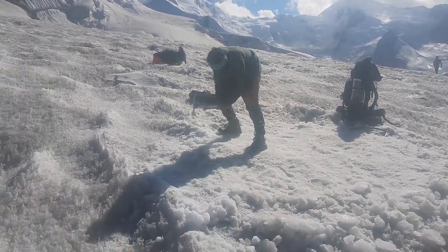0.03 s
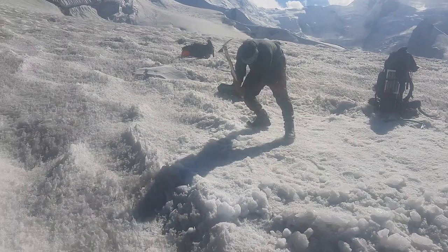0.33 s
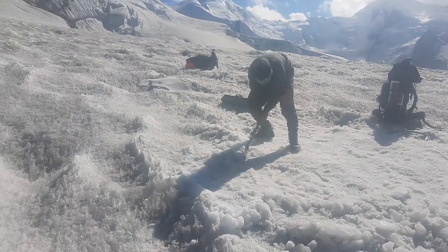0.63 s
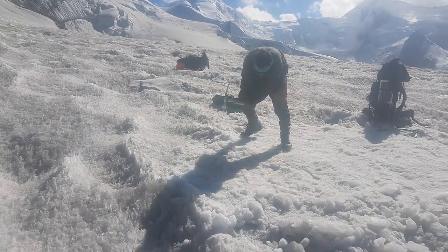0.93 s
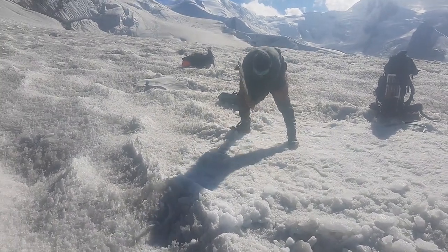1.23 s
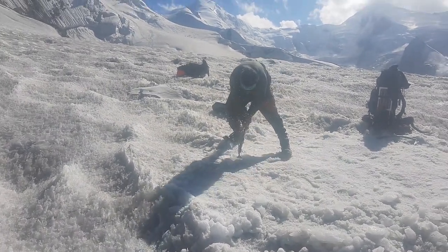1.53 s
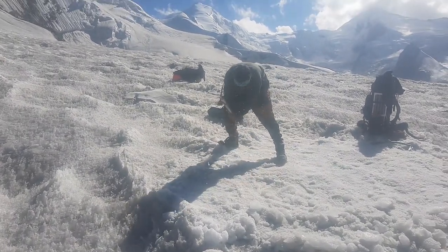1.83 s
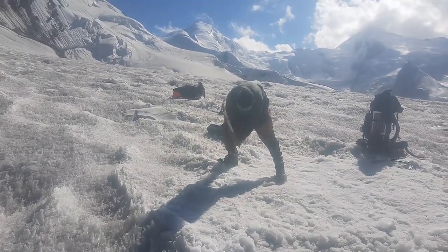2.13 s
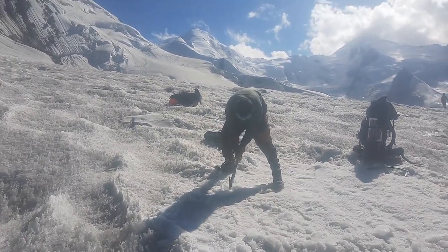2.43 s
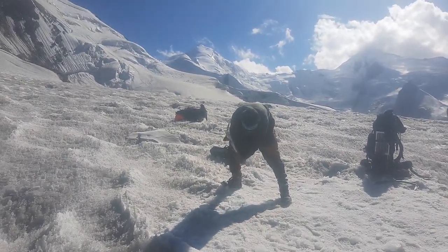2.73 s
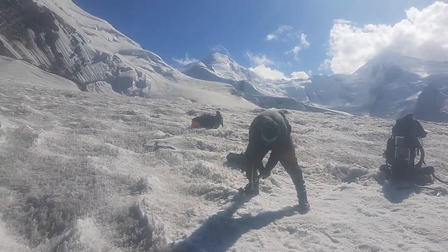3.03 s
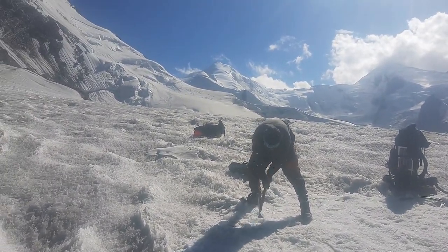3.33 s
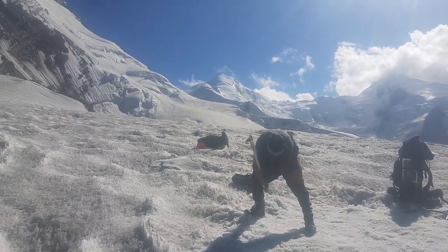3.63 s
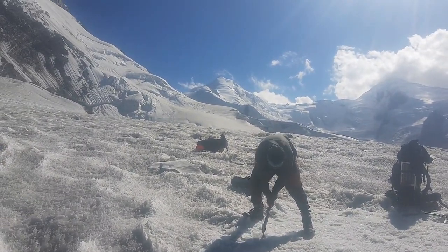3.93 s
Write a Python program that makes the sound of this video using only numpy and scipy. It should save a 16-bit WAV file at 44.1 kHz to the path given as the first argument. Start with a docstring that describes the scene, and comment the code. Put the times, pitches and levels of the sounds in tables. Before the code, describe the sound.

An ice axe chops hard snow four times at an even pace, each blow a crunch and a knock. Ice chips tick and clothing swishes faintly, while wind buffets a stereo microphone a few metres away on a glacier.

```python
"""On a glacier, a stereo microphone a few metres from a climber with an ice axe.
From the start, gusts buffet the two ports separately, the right one hardest, and clothing swishes
and squeaks. From 0.7 s to 3.2 s the axe chops the hard snow four times: each blow crunches, knocks
and throws up powder, and loose chips of ice tick around the swings. Just before the last blow comes a
sharp click, as of a wind pop overloading the microphone. Wind and a faint hiss carry on to the end."""
import sys
import numpy as np
from scipy.fft import rfft, irfft, next_fast_len
from scipy.io import wavfile
from scipy.ndimage import map_coordinates

SR = 44100
rng = np.random.default_rng(int(sys.argv[2]) if len(sys.argv) > 2 else 0)


def generate_wav(signal):
    """Clip the signal to [-1, 1] and save it as 16-bit WAV at the path in sys.argv[1]."""
    frames = np.transpose(np.atleast_2d(signal))
    scaled = np.clip(frames, -1, 1) * 32767
    pcm = np.round(scaled).astype(np.int16)
    wavfile.write(sys.argv[1], SR, pcm)


N = 176400

# axe blows (time [s], crunch [dB], knock [dB], thud [dB], thud pitch [Hz], delay of second break [s],
# second break [dB], spray [dB], treble tilt [dB/octave])
BLOWS = [(0.6642, -26, -42, -23.5, 980, 0.0068, -50, -57, 2.5),
         (1.5181, -21, -19, -15.5, 965, .013, -41, -49.5, 1.5),
         (2.3799, -22.5, -21, -13, 1230, 0.0099, -35, -57.5, -2.2),
         (3.2227, -26.5, -27, -25, 1310, .012, -49.5, -63, 0.6)]
# spectrum of breaking snow (frequency [Hz], relative density [dB])
SNOW_SPECTRUM = [(300, -17), (700, 7), (1500, 0), (2400, -3), (3200, 4.5), (5000, -3), (6000, 3), (7600, 2),
                 (10000, -4), (13000, -13), (15500, -24)]
SNOW_PAN_DB, CLOTH_PAN_DB = -8.5, -5  # left minus right


def amp(db):
    """Decibels as a gain."""
    return 10 ** (np.asarray(db) / 20)


def unit(x):
    """x scaled to rms 1."""
    return x / np.sqrt(np.mean(x ** 2) + 1e-20)


def along(points, hz):
    """(frequency [Hz], value) points, interpolated on a log axis."""
    freqs, values = np.transpose(points)
    return np.interp(np.log(hz + 1), np.log(freqs + 1), values)


def curve(points):
    """(time [s], value) points, interpolated to one value a sample."""
    return np.interp(np.arange(N) / SR, *np.transpose(points))


def wobble(rate):
    """A smooth random curve, rate knots a second."""
    return map_coordinates(rng.standard_normal(N // 4), [np.arange(N) * rate / SR], mode="wrap")


def filtered(x, response):
    """x through a filter given as a function of frequency."""
    size = next_fast_len(N + SR // 4)
    return irfft(rfft(x, size) * response(np.fft.rfftfreq(size, 1 / SR)), size)[..., :N]


def pan(db):
    """Left and right gains, the left louder by db."""
    return amp(np.array([[db], [-db]]) / 2)


def noise(spectrum, apart, tilt_db=0):
    """Stereo noise of rms 1, tilted above 1 kHz; apart is the size of what the ports do not share."""
    def colour(hz):
        return amp(along(spectrum, hz) + tilt_db * np.log2(np.maximum(hz / 1000, 1)))
    white = rng.standard_normal(N) + apart * rng.standard_normal((2, N))
    return unit(filtered(white, colour))


def burst(start, attack, hold, t60):
    """Envelope of attack, hold and exponential release, all in seconds."""
    t = np.arange(N) / SR - start
    return np.clip(t / attack, 0, 1) * np.exp(-np.log(1000) * np.clip((t - attack - hold) / t60, 0, 5))


def crunch(lump_db=6.5):
    """The pick breaks the crust, breaks it again as it sinks in, and throws up a gritty spray."""
    out = np.zeros((2, N))
    lumps = unit(amp(lump_db * wobble(rate=680)))
    for start, db, _, _, _, delay, second_db, spray_db, tilt_db in BLOWS:
        first_break = amp(db) * burst(start, attack=0.00049, hold=0.0025, t60=0.02)
        second_break = amp(second_db) * burst(start + delay, attack=0.0013, hold=0.0025, t60=0.028)
        spray = amp(spray_db) * lumps * burst(start, attack=0.011, hold=0.005, t60=0.18)
        out += (first_break + second_break + spray) * grit(tilt_db)
    return out * pan(SNOW_PAN_DB)


def grit(tilt_db, rough_db=3, left_lag_s=0.000021):
    """Dense breaking of snow crystals, heard first at the right port."""
    crystals = noise(SNOW_SPECTRUM, apart=0.5, tilt_db=tilt_db) * amp(rough_db * wobble(rate=2500))
    delays = np.array([[left_lag_s], [-left_lag_s]]) / 2
    return unit(filtered(crystals, lambda hz: np.exp(-2j * np.pi * hz * delays)))


def knock(delay_s=0.00098, attack_s=0.00043, thud_t60=0.017):
    """The axe rings briefly, damped by the snow, over the dead thud of the crust."""
    # modes of pick and shaft (frequency [Hz], level relative to the knock [dB], t60 [s])
    axe_modes = [(646, -11.5, 0.027), (810, -10, 0.028), (1746, -2.5, 0.037), (1844, -4, .035),
                 (2244, -15, .025), (3066, -4, 0.026), (4140, -14, .03), (5965, -25, .05),
                 (7180, -9, 0.035)]
    out, t = np.zeros(N), np.arange(SR // 8) / SR
    for start, _, knock_db, thud_db, thud_hz, *_ in BLOWS:
        modes = [(hz, db + knock_db, t60) for hz, db, t60 in axe_modes]
        ring = np.zeros(len(t))
        for hz, db, t60 in modes + [(thud_hz, thud_db, thud_t60)]:
            decay = amp(db + rng.normal(0, 0.6)) * np.exp(-np.log(1000) * t / t60)
            ring += decay * np.sin(2 * np.pi * (hz * rng.normal(1, 0.0036) * t + rng.random()))
        out[round((start + delay_s) * SR):][:len(t)] += ring * (1 - np.exp(-t / attack_s))
    return out * pan(db=4)


def ticks(gain_db=-9.5, width_octaves=1.2, crumbs_per_s=8.2, crumb_db=-52, crumb_t60=0.026):
    """Short noise bursts: ice chips and crumbs on the crust, and one sharp click on a wind pop."""
    # ticks (time [s], relative level [dB], band centre [Hz], t60 [s]); the one at 3.07 s is the
    # click of a wind pop overloading the microphone, the others are ice chips
    timed_ticks = [(0.127, -48, 7500, 0.022), (.1425, -32.5, 5000, 0.0054), (0.553, -39, 7000, 0.043),
                   (0.8947, -30, 3480, 0.0092), (1.155, -37, 1900, .035), (1.32, -30, 7000, .04),
                   (1.336, -32, 3500, .035), (1.4583, -35, 6000, .025), (1.574, -37, 7500, .04),
                   (1.6426, -38, 9000, 0.015), (1.652, -40, 9000, .015), (1.7752, -39, 7000, 0.054),
                   (2.3212, -47.5, 7500, .03), (2.572, -34, 2200, 0.013), (2.6557, -48, 4000, 0.036),
                   (2.6765, -46, 5000, 0.035), (2.903, -42.5, 4200, 0.02), (3.0698, -37, 3910, 0.0042),
                   (3.391, -49.5, 7000, .04), (3.4953, -37, 5850, .04), (3.9848, -45.5, 6900, 0.043)]
    crumbs = [(when * N / SR, crumb_db + 4.5 * (2 * size - 1), 4000 + 5000 * brightness, crumb_t60)
              for when, size, brightness in rng.random((int(crumbs_per_s * N / SR), 3))]
    out, t = np.zeros((2, N + SR)), np.arange(SR // 10) / SR
    octave = np.log2(np.fft.rfftfreq(len(t), 1 / SR) + 1)
    colour = amp(along(SNOW_SPECTRUM, 2 ** octave))
    for start, db, hz, t60 in timed_ticks + crumbs:
        white = rng.standard_normal(len(t)) + 0.5 * rng.standard_normal((2, len(t)))
        band = np.exp(-((octave - np.log2(hz)) / width_octaves) ** 2)
        tick = unit(irfft(rfft(white) * band * colour, len(t))) * np.exp(-np.log(1000) * t / t60)
        out[:, round(start * SR):][:, :len(t)] += amp(db + gain_db) * tick
    return out[:, :N] * pan(SNOW_PAN_DB)


def wind():
    """Gusts reach the two microphone ports separately."""
    # gust strength at each port (time [s], level [dB])
    left_gusts = [(0.0, -15.5), (0.15, -22.5), (0.18, -18), (0.23, -21.5), (0.27, -16.0), (0.29, -18),
                  (0.32, -23), (0.35, -34.0), (0.5, -27), (0.53, -14.5), (0.57, -27.5), (0.63, -16),
                  (0.78, -28), (0.8, -18.0), (0.99, -33.5), (1.02, -28.5), (1.12, -22.5), (1.16, -37.5),
                  (1.37, -21), (1.41, -36.5), (1.43, -20.5), (1.58, -34), (1.76, -23), (1.78, -26),
                  (1.83, -17), (1.86, -22), (1.88, -10.0), (1.9, -15.5), (1.93, -10), (1.96, -15.5),
                  (2.03, -14), (2.05, -15.5), (2.07, -17.5), (2.23, -22.5), (2.26, -13.5), (2.36, -31),
                  (2.63, -33), (2.7, -25.5), (2.84, -27.0), (3.04, -23.5), (3.08, -11.5), (3.12, -26),
                  (3.45, -24), (3.74, -33.5), (3.78, -59), (3.82, -21), (3.84, -41), (3.89, -20.5),
                  (3.92, -34.5), (4.0, -21)]
    right_gusts = [(0.0, -5.5), (0.08, -13.5), (0.1, -8.5), (0.12, -12), (0.14, -3.5), (0.18, -19.5),
                   (0.2, -11.5), (0.22, -19.5), (0.24, -9), (0.26, -15.5), (0.28, -7), (0.31, -18.0),
                   (0.33, -11), (0.36, -16), (0.38, -4.5), (0.41, -28.5), (0.43, -3.5), (0.47, -21),
                   (0.5, -9.5), (0.57, -14.5), (0.63, -7.5), (0.67, -15), (0.69, -9.5), (0.71, -15.0),
                   (0.83, -15), (0.85, -6), (0.87, -11.5), (0.89, -11), (0.99, -15), (1.01, -23),
                   (1.03, -16.5), (1.07, -14), (1.11, -38), (1.33, -34.5), (1.68, -44.5), (1.73, -17.5),
                   (1.88, -39), (1.91, -12.5), (2.05, -11), (2.09, -25.5), (2.11, -11), (2.13, -17),
                   (2.17, -11.5), (2.23, -15.5), (2.3, -14.5), (2.37, -20), (2.44, -21.5), (2.5, -35.5),
                   (2.54, -16.0), (2.59, -13.5), (2.66, -31.5), (2.79, -11.0), (2.87, -16), (2.96, -11.5),
                   (3.02, -16.5), (3.07, -8.5), (3.09, -23.5), (3.11, -14), (3.16, -14.5), (3.18, -27.5),
                   (3.2, -13.5), (3.23, -12.5), (3.33, -30), (3.43, -20), (3.45, -26), (3.54, -11),
                   (3.56, -21.5), (3.59, -10.5), (3.63, -18.5), (3.68, -21), (3.71, -11), (3.75, -15.5),
                   (3.88, -16.5), (3.95, -26.5), (3.98, -20.5), (4.0, -32)]
    return np.array([buffet(left_gusts, port_db=-1.33, tilt_db=-0.24),
                     buffet(right_gusts, port_db=-1.26, tilt_db=-0.05)])


def buffet(gusts, port_db, tilt_db, strong_gust_db=-12.5, stall_db=3):
    """Turbulence at one port: the stronger the gust, the higher its fluttering bursts reach."""
    # bands in a strong gust (centre [Hz], level [dB], growth [dB per dB of gust], flutter depth [dB])
    bands = [(15, -49.5, -0.7, 0.5), (32, -35.5, 1, -3.5), (64, -24.5, 0.55, 0.5), (131, -17, 0.91, 3.5),
             (257.4, -18, 1.34, 3.5), (498, -23, 2.03, 6.3), (987, -35, 3, 8.5), (2010, -53, 4.5, 8),
             (3970, -76, 6.5, 13.5)]
    centres = [hz for hz, *_ in bands]
    edges = [centres[0] / 2] + centres + [centres[-1] * 2]
    density = [(hz, db - 10 * np.log10(hz)) for hz, db, _, _ in bands]
    excess_db = curve(gusts) - strong_gust_db
    flutter = 2 * np.tanh(wobble(rate=330) / 2)
    white, out = rng.standard_normal(N), np.zeros(N)
    for k, (hz, db, growth, flutter_db) in enumerate(bands):
        triangle = [(edges[k], 0), (hz, 1), (edges[k + 2], 0)]
        band = unit(filtered(white, lambda f: along(triangle, f) * amp(along(density, f))))
        # past stall_db all bands grow alike: louder, but no brighter
        drive_db = growth * np.minimum(excess_db, stall_db) + 0.6 * np.maximum(excess_db - stall_db, 0)
        out += amp(db + drive_db + tilt_db * np.log2(hz / 200)) * band * unit(amp(flutter_db * flutter))
    return amp(port_db) * out


def pops(lowpass_hz=1400):
    """An eddy hits one port: a quick push of pressure and a slower suction."""
    # single eddies (time [s], port, peak before the low-pass [dB], rise [s])
    eddies = [(0.0136, "right", -2, 0.00062), (.0838, "right", 1, 0.00023),
              (0.189, "right", -10.5, 0.00035), (.284, "right", -11, 0.00021),
              (0.3302, "right", 0, 0.00056), (0.4377, "right", -5, 0.00057), (.523, "right", -7.5, .0006),
              (0.6218, "right", -4, 0.0003), (0.641, "right", 1, 0.00028), (0.8442, "right", -5, 0.00068),
              (0.857, "right", -2, 0.00088), (0.897, "right", 0, .0009), (1.0367, "right", -7, 0.0011),
              (1.0659, "right", -5, 0.0006), (1.9187, "left", -15, 0.00084), (1.9435, "right", -15, 0.0011),
              (2.0621, "right", -4.5, 0.00035), (2.7778, "right", -7.5, 0.00039),
              (3.0503, "right", -6, 0.00066), (3.0694, "right", 1, 0.00041),
              (3.0756, "right", -3.5, 0.00043), (3.1122, "right", -5.5, 0.0011),
              (3.1548, "right", -14, .0007), (3.1998, "right", -8, 0.00099), (3.5374, "right", -6, 0.00038),
              (3.576, "right", -11, 0.001), (3.591, "right", -5, 0.00083)]
    out = np.zeros((2, N))
    for start, port, db, rise in eddies:
        age = np.maximum(np.arange(N) / SR - start, 0) / rise
        pressure = age * (2 - age) * np.exp(-age)
        out[int(port == "right")] += amp(db) * pressure / pressure.max()
    return filtered(out, lambda hz: 1 / (1 + (hz / lowpass_hz) ** 4))


def clothing(rough_db=2):
    """Shell fabric rubs as the body moves; each swish swells and fades."""
    # swishes (peak time [s], rise [s], fall [s], level [dB], treble tilt [dB/octave])
    swishes = [(0.031, 0.029, 0.045, -53, -5), (.26, .07, 0.1, -55, -0.5), (.44, 0.065, 0.11, -55.5, -1),
               (.56, .04, 0.025, -58, 2), (.74, 0.034, 0.069, -64, 2.5), (1.327, .04, 0.028, -51.5, 1.5),
               (1.379, 0.21, 0.23, -57.5, -1), (1.601, 0.09, 0.062, -55, -2.5), (1.799, .03, 0.043, -59, 8),
               (2.13, 0.038, 0.022, -63, 8.5), (2.679, 0.24, 0.16, -65.5, 3),
               (2.959, 0.035, 0.06, -57, -6.5), (3.509, .015, 0.026, -54, -4)]
    # spectrum of rubbing fabric (frequency [Hz], relative density [dB])
    fabric_spectrum = [(400, 1), (1200, 6), (3200, 4), (5000, -1), (7500, 1), (10000, -8.5), (13000, -19.5),
                       (16000, -19.5)]
    out, t = np.zeros((2, N)), np.arange(N) / SR
    for peak, rise, fall, db, tilt_db in swishes:
        swell = np.exp(-((t - peak) / np.where(t < peak, rise, fall)) ** 2)
        out += amp(db) * swell * noise(fabric_spectrum, apart=1.0, tilt_db=tilt_db)
    return out * amp(rough_db * wobble(rate=240)) * pan(CLOTH_PAN_DB)


def squeaks(jitter=0.04, rough_db=4.5):
    """Rubbing fabric and snow stick and slip at an unsteady, gliding rate."""
    # squeaky scrapes (peak time [s], half length [s], pitch [Hz], level [dB], glide [octaves/s])
    scrapes = [(0.276, .045, 5080, -61, -0.98), (0.259, .04, 10000, -64, -0.16),
               (0.447, 0.018, 3430, -57, -0.76), (2.962, .04, 3060, -61.5, 0.75),
               (2.966, .035, 3620, -64, 0.52), (2.97, .035, 7250, -69.5, 0.32)]
    out, t = np.zeros(N), np.arange(N) / SR
    for peak, half, hz, db, glide in scrapes:
        octaves = glide * np.clip(t - peak, -2 * half, 2 * half)
        pitch = hz * 2 ** octaves * (1 + jitter * wobble(rate=1600))
        slips = unit(np.sin(2 * np.pi * np.cumsum(pitch) / SR) * amp(rough_db * wobble(rate=210)))
        out += amp(db) * np.exp(-((t - peak) / half) ** 2) * slips
    return out * pan(CLOTH_PAN_DB)


def air(gain_db=2.5):
    """Air moving over the snow slope hisses faintly."""
    # spectrum of the hiss (frequency [Hz], relative density [dB])
    hiss_spectrum = [(880, -45), (1500, -11.5), (1930, 0), (2170, -0.5), (2330, -2.5), (3480, -3.5),
                     (4140, 0), (4750, -3.5), (8540, -3.5), (15500, -17)]
    # its slow swell (time [s], relative level [dB])
    hiss_swell = [(0.0, -69.5), (0.26, -69.5), (0.37, -67), (0.56, -66), (0.85, -70), (1.11, -70.5),
                  (1.41, -65), (1.53, -65.5), (1.9, -69.5), (2.84, -70), (3.04, -75), (4.0, -70)]
    return amp(curve(hiss_swell) + gain_db) * noise(hiss_spectrum, apart=1.0) * pan(db=-4)


def scene():
    """Wind on the microphone, the climber at work and the air behind, in stereo."""
    return wind() + pops() + crunch() + knock() + ticks() + clothing() + squeaks() + air()


def record(dry, top_hz=15800):
    """The recorder rounds off peaks near full scale and keeps nothing above its band limit."""
    rounded = dry / (1 + np.abs(dry) ** 8) ** (1 / 8)
    return filtered(rounded, lambda hz: hz < top_hz)


dry = scene()
out = record(dry)
generate_wav(out)
```